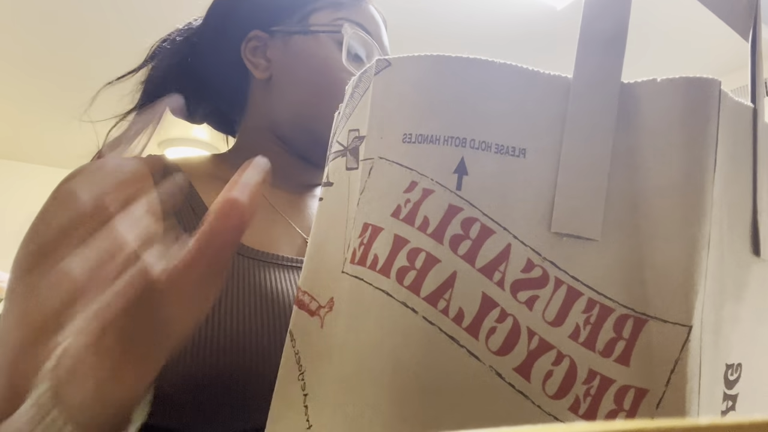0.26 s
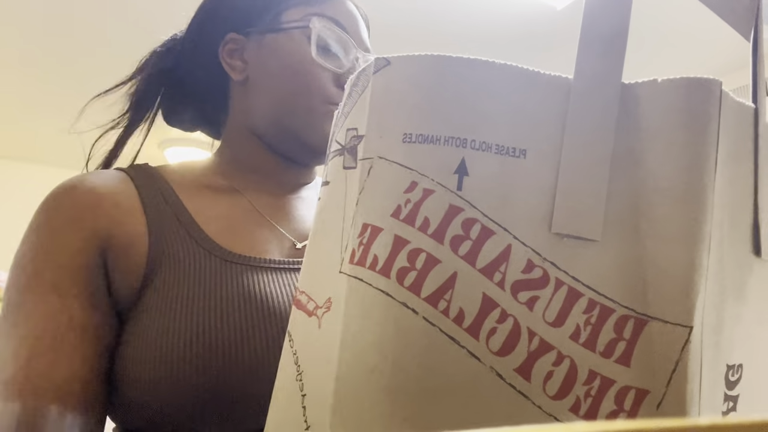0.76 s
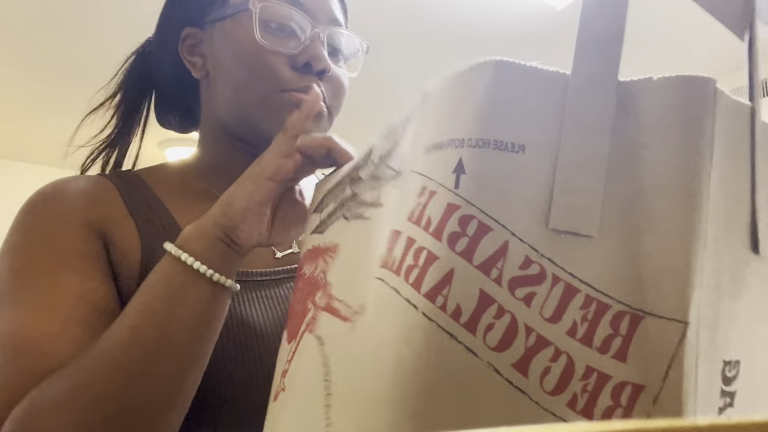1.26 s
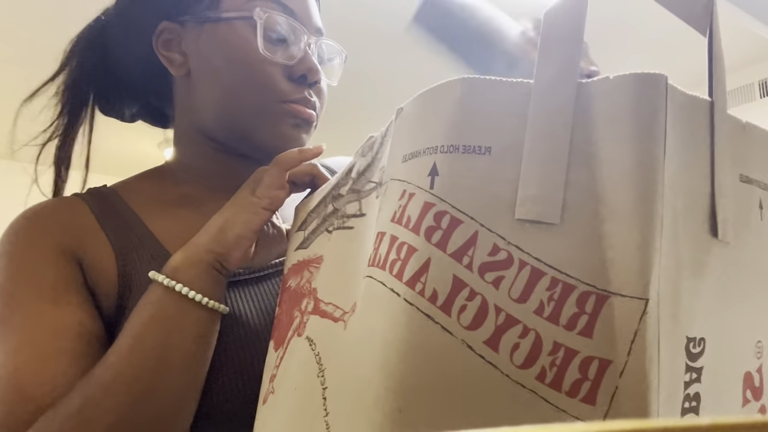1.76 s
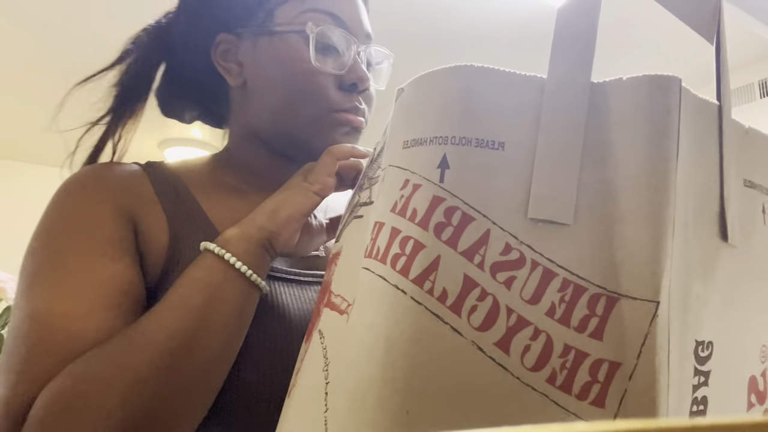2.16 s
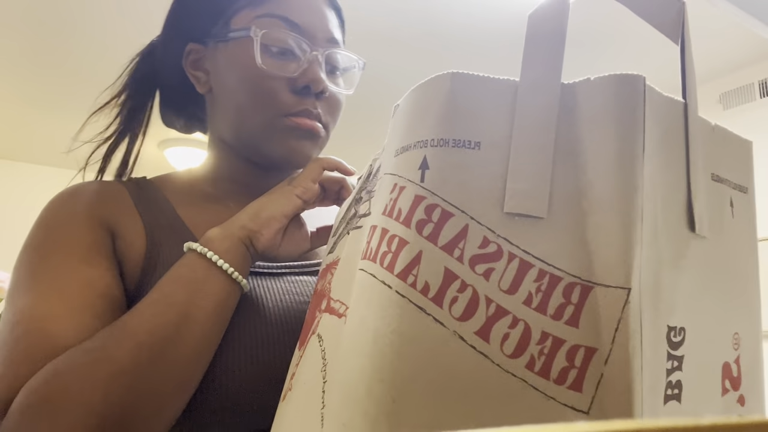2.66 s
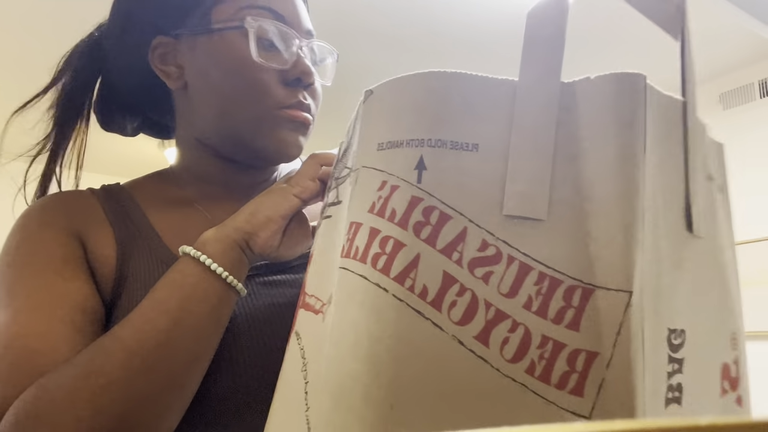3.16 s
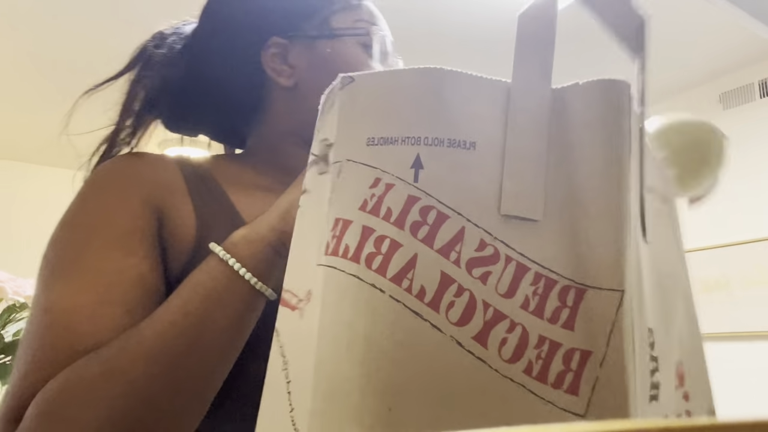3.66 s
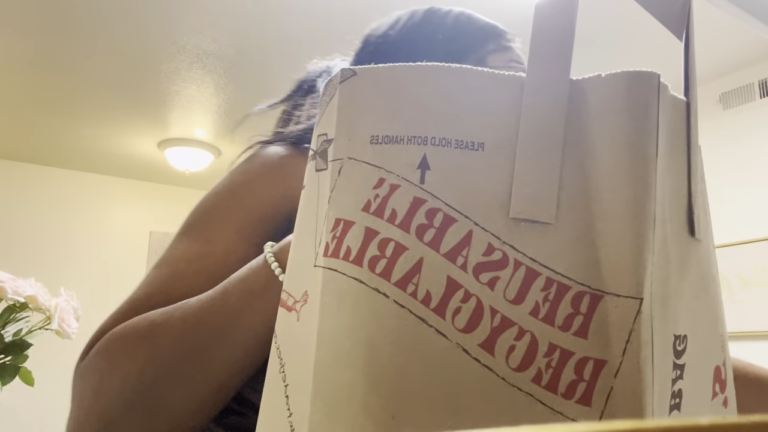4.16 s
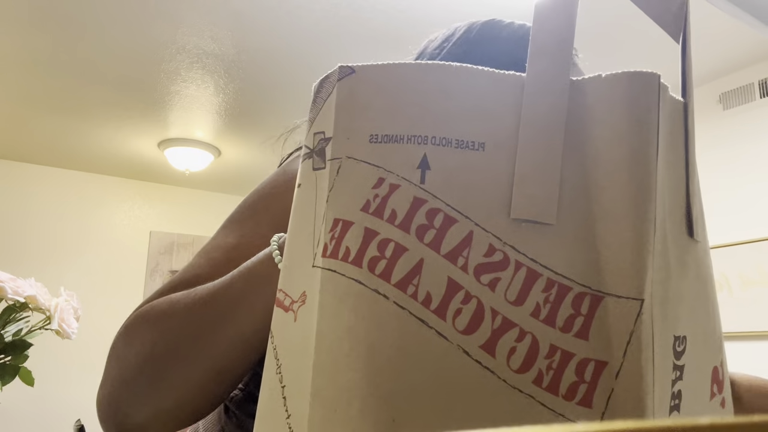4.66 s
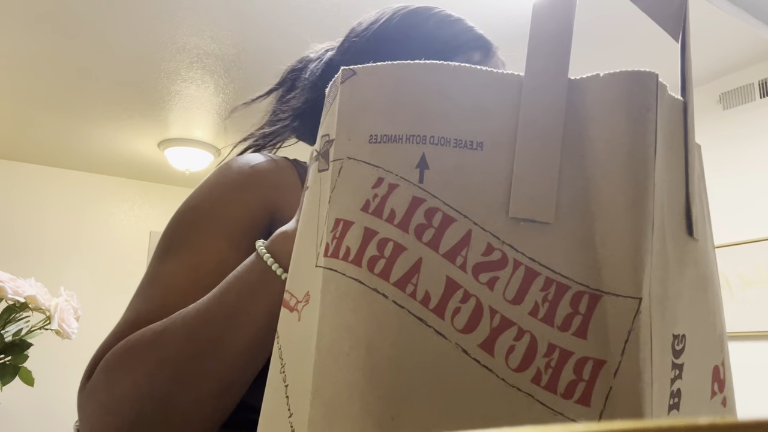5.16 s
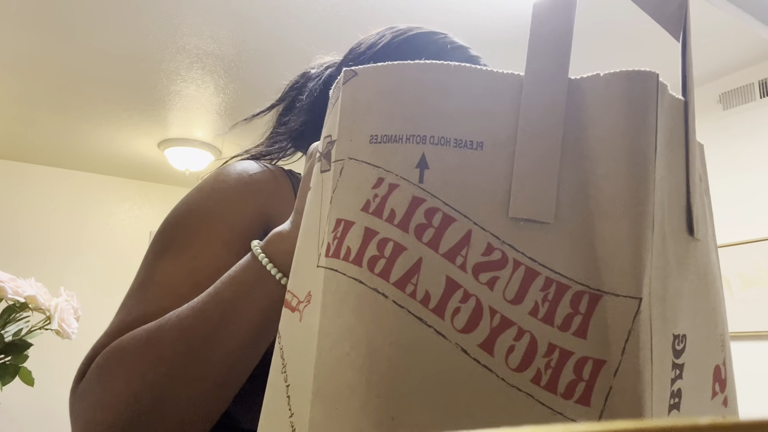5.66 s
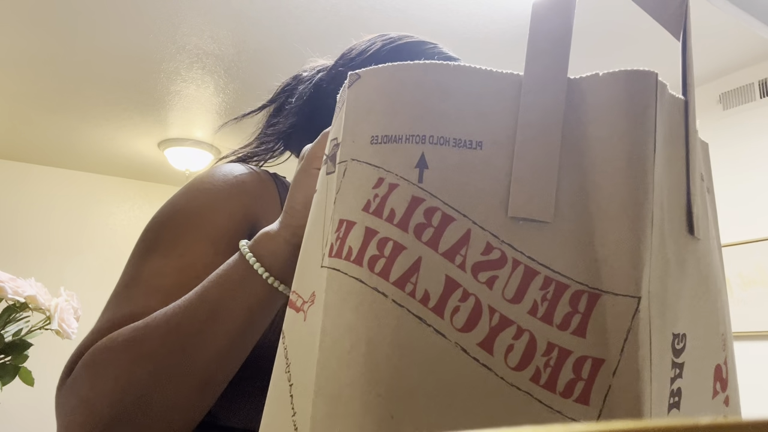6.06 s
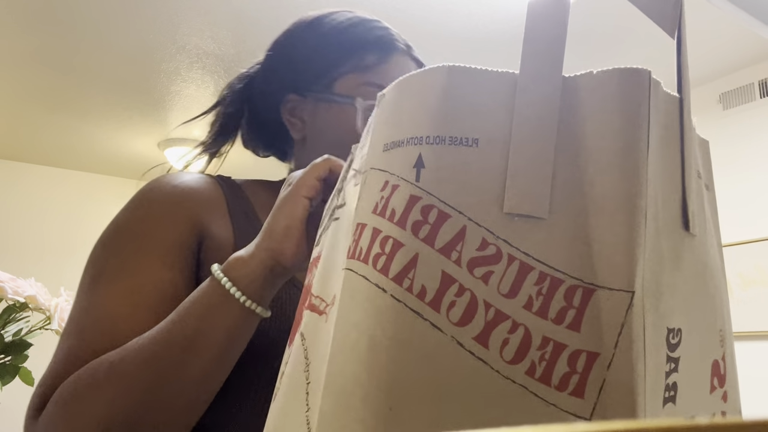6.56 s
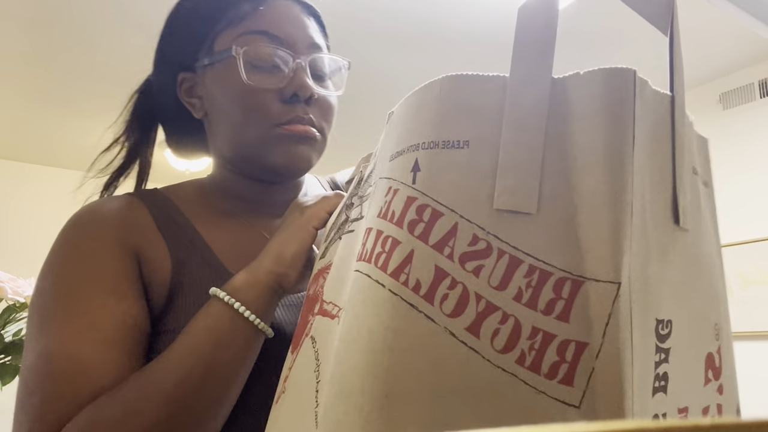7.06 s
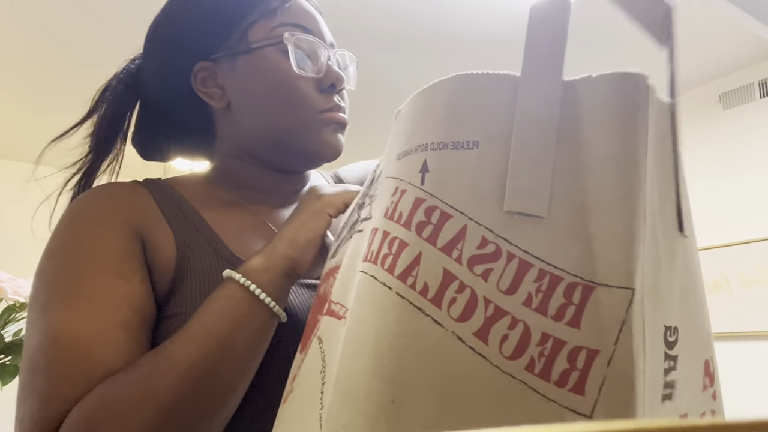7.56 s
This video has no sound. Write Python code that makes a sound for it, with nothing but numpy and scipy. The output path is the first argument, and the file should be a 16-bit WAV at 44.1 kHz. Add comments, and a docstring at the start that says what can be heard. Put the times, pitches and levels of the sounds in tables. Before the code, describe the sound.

Close stereo pickup of a stiff paper grocery bag on a counter in a small, hard kitchen, with low fridge hum, dull air and thin hiss beneath. At 0.1 s packets clatter and creases snap sharply; another packet knock lands around 0.45 s, and a harder one with a short tub ring at 0.9 s. From 1.2 to 1.7 s paper walls flap with low thumps and midrange tocks. At 2.2 s packs bump dully with a crisp paper snap, then scattered crinkles continue, with snaps near 2.8 and a fuller flap around 3.6 s. Rustling fades until a clattering knock at 4.5 s. From 5 to 6.4 s it is almost still, with a soft knock at 5.7 s. Faint creasing resumes, then from 7.1 s to the end come strong, dense crackles, scrapes and wall thumps.

```python
"""Stiff paper rustles and, almost at once, packed groceries clatter as hands dig through a grocery bag on a counter.
Shaped noise makes the sliding paper; short pitched swings and noise bursts make its snapping creases.
Low swings flap the walls, packs land in showers of small contacts, and a knocked tub rings in tuned modes.
A small hard kitchen answers with early reflections and a noise tail, over a fridge hum, dull air and a thin hiss."""
import sys
import numpy as np
from scipy import signal
from scipy.fft import rfft, irfft, next_fast_len
from scipy.io import wavfile

SR = 44100
rng = np.random.default_rng(int(sys.argv[2]) if len(sys.argv) > 2 else 0)


def inscribe(sig):
    """Save sig as 16-bit PCM at rate SR to the path in sys.argv[1].

    A 1-D sig is mono; a 2-D sig holds one channel per row.
    Samples are clipped to [-1, 1] before scaling.
    """
    pcm = np.round(np.clip(np.atleast_2d(sig).T, -1, 1) * 32767)
    wavfile.write(sys.argv[1], SR, pcm.astype(np.int16))


N = 344862
TIME = np.arange(N) / SR
SIZE = next_fast_len(N + SR, real=True)
FREQ = np.maximum(np.arange(SIZE // 2 + 1) * SR / SIZE, 1)


def undb(db):
    """Decibels to gain."""
    return 10 ** (np.asarray(db) / 20)


def over_freq(points):
    """Join (hz, value) points on a log-frequency axis."""
    hz, value = np.transpose(points)
    return np.interp(np.log(FREQ), np.log(hz), value)


def peaks(rings):
    """Level in dB of a set of resonances and dips."""
    return sum(db / (1 + (2 * (FREQ - hz) / width) ** 2) for hz, width, db in rings)


def resonant(points, rings):
    """Gain of a broad colour with resonance peaks on it."""
    return undb(over_freq(points) + peaks(rings))


def band(lo_hz, hi_hz, order=8):
    """Gain of a band with steep, smooth edges."""
    return 1 / np.sqrt((1 + (lo_hz / FREQ) ** order) * (1 + (FREQ / hi_hz) ** order))


def colour(x, gain):
    """Causal minimum-phase filter with the given gain shape; white noise keeps its power."""
    unit_gain = gain / np.sqrt(np.mean(gain ** 2))
    cepstrum = irfft(np.log(unit_gain + 1e-4), SIZE)
    # fold the cepstrum forward in time so that the filter never rings early
    cepstrum[1:SIZE // 2] *= 2
    cepstrum[SIZE // 2 + 1:] = 0
    return irfft(rfft(x, SIZE) * np.exp(rfft(cepstrum)), SIZE)[..., :N]


def add(track, s, sound):
    """Mix a sound into a track at time s."""
    start = max(int(s * SR), 0)
    part = track[..., start:start + sound.shape[-1]]
    part += sound[..., :part.shape[-1]]


def fade(t60):
    """An exponential decay down to -60 dB, kept between 2 ms and 1 s long."""
    count = int(np.clip(t60, .002, 1) * SR)
    return np.exp(-np.log(1000) * np.arange(count) / count)


def walk(rate):
    """Wandering random curve with a spread near 1 and the given number of turning points a second."""
    knots = rng.standard_normal(4096)
    return np.interp(TIME * rate, np.arange(len(knots)), knots)


def crinkle(rate, spread_db, t60):
    """Envelope of fibres giving way at random, mostly small and a few large; mean power 1."""
    breaks = rng.random(N) < rate / SR
    size = undb(spread_db * np.minimum(rng.exponential(size=N), 4))
    power = np.abs(signal.oaconvolve(breaks * size ** 2, fade(t60) ** 2)[:N])
    return np.sqrt(power / power.mean())


# strokes of a hand sliding the paper; start_s is when the stroke has taken hold, levels are relative
# columns: start_s, length_s, rustle_db, hiss_db, wall_sway_db
HAND_STROKES = [(0.0, 0.38, -41.5, -43, -47.5), (0.172, 0.038, -57, -56.5, -30),
                (0.496, 0.068, -41, -35.5, -38.5), (0.61, 0.31, -47, -47.5, -59),
                (0.944, 0.044, -39, -42.5, -34), (1.231, 0.29, -40, -50.5, -33),
                (1.601, 0.017, -41, -45, -41), (1.673, 0.013, -42.5, -47.5, -29),
                (1.752, 0.36, -47, -54, -46.5), (2.265, 0.036, -26, -38, -28.5),
                (2.856, 0.0096, -34.5, -38, -26.5), (3.091, 0.032, -46, -49, -41.5),
                (3.154, 0.045, -48, -59.5, -37), (3.602, 0.094, -37.5, -49.5, -30),
                (3.782, 0.029, -62, -59, -40), (4.122, 0.42, -57, -65, -51),
                (4.585, 0.039, -27, -34, -28.5), (4.714, 0.1, -50.5, -78, -42),
                (4.866, 0.26, -62, -75.5, -51), (5.195, 0.039, -48.5, -56.5, -45),
                (6.365, 0.13, -59.5, -77, -45), (6.504, 0.18, -59.5, -70, -53),
                (6.66, 0.1, -51.5, -57.5, -50), (6.803, 0.11, -55, -74, -50.5),
                (6.983, 0.18, -52, -56.5, -48), (7.119, 0.12, -32, -41.5, -27.5),
                (7.431, 0.018, -36, -41.5, -34.5), (7.505, 0.042, -31.5, -36, -30),
                (7.636, 0.3, -32.5, -41, -34)]
# a stroke swells in as the paper takes the load, then eases a little
STROKE_RISE_DB_PER_S, STROKE_SAG_DB_PER_S = 260, 1.5
# the paper settles after the hand stops
SLIDE_RELEASE_DB_PER_S, SWAY_RELEASE_DB_PER_S = 171, 135
# rustle, hiss and sway while the arm only leans on the bag
RESTING_DB = (-76, -83, -54)


def effort(levels_db, resting_db, release_db_per_s):
    """Strength of the hands' work: every stroke swells, holds with a slight sag and dies away."""
    t = TIME[::64]
    power = undb(resting_db) ** 2
    for (s, length, *_), db in zip(HAND_STROKES, levels_db):
        early, held, late = np.maximum([s - t, t - s, t - s - length], 0)
        rise_db = STROKE_RISE_DB_PER_S * early
        fall_db = STROKE_SAG_DB_PER_S * held + release_db_per_s * late
        power = power + undb(db - rise_db - fall_db) ** 2
    return np.interp(TIME, t, np.sqrt(power))


def hands():
    """How strongly the strokes drive the rustle, the hiss and the sway of the walls."""
    releases = SLIDE_RELEASE_DB_PER_S, SLIDE_RELEASE_DB_PER_S, SWAY_RELEASE_DB_PER_S
    return [effort(*drive) for drive in zip(np.transpose(HAND_STROKES)[2:], RESTING_DB, releases)]


def pop(hz, t60, rise_s, overtone_ratio, overtone_db):
    """A stiff facet swings for a few cycles, along with a shorter overtone."""
    decay = fade(t60)
    t = TIME[:len(decay)]
    fundamental = np.sin(2 * np.pi * hz * t)
    overtone = undb(overtone_db) * decay * np.sin(2 * np.pi * hz * overtone_ratio * t)
    return decay * (1 - np.exp(-t / rise_s)) * (fundamental + overtone)


def facets(effort, count=520, centre_hz=1150, octaves=.55, spread_db=4.5, t60=0.023):
    """Small facets buckle at random, each with its own pitch, louder as the hands work harder."""
    out = np.zeros((2, N))
    times = rng.random(count) * (N - 1) / SR
    sizes = np.minimum(rng.exponential(size=count), 3)
    for s, size, (pitch, facing) in zip(times, sizes, rng.standard_normal((count, 2))):
        tock = pop(centre_hz * 2 ** (octaves * pitch), t60, 0.0081, 1.0, -11.5)
        level = effort[int(s * SR)] * undb(spread_db * size)
        add(out, s, level * tock * np.array([[1], [np.tanh(facing)]]))
    return out


# colour of the paper, relative level; columns: pitch_hz, level_db
PAPER_COLOUR = [(60, 15.5), (120, -1), (250, -9), (420, 0), (650, 1.5), (1050, -0.5), (1600, -5),
                (2600, -15.5), (4500, -22), (7000, -25), (11000, -31), (15500, -31.5)]
# resonances of the bag; columns: pitch_hz, width_hz, boost_db
BAG_RESONANCES = [(109, 58, 14), (234.5, 110, 20), (304, 50, 1), (1025, 14, 6.5)]
# share of the rustle's power that is a smooth slide; the rest crinkles
SLIDE_SHARE = .55


def rustle(mid, hiss, sway, rustle_db=-5, hiss_db=-2, sway_db=-5, facet_db=0, judder_db=1.0):
    """Paper rubs on paper: a slide shot through with crinkles and buckling facets, over the sway of the walls."""
    crinkle_power = crinkle(rate=270, spread_db=4.5, t60=.025) ** 2
    grip = np.sqrt(SLIDE_SHARE + (1 - SLIDE_SHARE) * crinkle_power) * undb(judder_db * walk(40))
    friction = rng.standard_normal((2, N))
    paper = resonant(PAPER_COLOUR, BAG_RESONANCES)
    slide = colour(friction * grip * mid, paper * band(390, 3600))
    bright = colour(friction * grip * hiss, paper * band(2900, 17000))
    # the heavy walls follow only the mean push, not each catch of the grip
    walls = colour(friction * sway, paper * band(39, 480))
    rubbing = slide * undb(rustle_db) + bright * undb(hiss_db) + walls * undb(sway_db)
    return rubbing + facets(mid) * undb(facet_db)


def crack(hz, t60, low_ratio=0.65, high_ratio=1.405):
    """A fold gives way at once: a dry burst about an octave wide around its pitch."""
    decay = fade(t60)
    edges = np.clip([hz * low_ratio, hz * high_ratio], 50, .45 * SR)
    burst = rng.standard_normal((2, len(decay))) * decay
    sos = signal.butter(4, edges, "band", fs=SR, output="sos")
    # make up for the power lost outside the band
    return signal.sosfilt(sos, burst) * np.sqrt(SR / 2 / (edges[1] - edges[0]))


def ticks(hiss, count=400, centre_hz=4200, octaves=0.96, tick_db=-5, spread_db=4, t60=0.0044):
    """Tiny kinks tick at random, each with its own high pitch, following the hiss of the stroke."""
    out = np.zeros((2, N))
    for when, chance, pitch in rng.random((count, 3)):
        size = min(-np.log(1 - chance), 2.5)
        level = hiss[int(when * N)] * undb(tick_db + spread_db * size)
        hz = centre_hz * 2 ** (octaves * (2 * pitch - 1))
        add(out, when * N / SR, level * crack(hz, t60))
    return out


KICK_RISE_CYCLES = .45


def kick(hz, cycles):
    """A facet flips over: a swing that builds within its first cycle and dies over the given number of cycles."""
    decay = fade(cycles / hz)
    turns = hz * TIME[:len(decay)]
    return decay * (1 - np.exp(-(turns / KICK_RISE_CYCLES) ** 2)) * np.sin(2 * np.pi * turns)


def folds(x, echo, count=5, reach_s=.004):
    """A few echoes off nearby folds give each blow its own uneven colour at about the same power."""
    lags = (reach_s * SR * (.1 + .9 * rng.random(count))).astype(int)
    signs = rng.choice([-1, 1], count)
    echoes = sum(sign * np.roll(x, lag, axis=-1) for lag, sign in zip(lags, signs))
    return (x + echo * echoes) / np.sqrt(1 + count * echo ** 2)


def strikes(table, gain, grain, rise_s, fold_echo, body_db, mid_db, crackle_db, body_hold, pop_db, pop_hold,
            sideways, crack_db, crack_hold, crackle_rise_s, kick_db, kick_cycles):
    """Each blow kicks, cracks and pops a facet and sets off a dying shower of slips in body, panel and creases."""
    showers, pops = np.zeros((3, 2, N)), np.zeros((2, N))
    for s, db, crackle, body, hz, t60 in table:
        longest = len(fade(t60 * max(body_hold, 1)))
        slips = folds(rng.standard_normal((2, longest)), fold_echo)
        parts = ((body + body_db, t60 * body_hold, rise_s),
                 (mid_db, t60, rise_s),
                 (crackle + crackle_db, t60, crackle_rise_s))
        for track, (part_db, life, rise) in zip(showers, parts):
            decay = fade(life)
            swell = 1 - np.exp(-TIME[:len(decay)] / rise)
            add(track, s, undb(db + part_db) * swell * decay * slips[:, :len(decay)])
        facing = np.array([[1], [rng.choice([-1, 1]) * sideways]])
        add(pops, s, undb(db + kick_db) * kick(hz, kick_cycles) * facing)
        add(pops, s, undb(db + pop_db) * pop(hz, t60 * pop_hold, rise_s, 1.4, -12.0) * facing)
        add(pops, s, undb(db + crack_db) * crack(hz, t60 * crack_hold))
    bands = band(170, 600), band(600, 2500), band(2500, 17000)
    return pops + sum(colour(shower * grain, gain * b) for shower, b in zip(showers, bands))


# small creases give way at random under a stroke; the level is the least one, over the rustle
CREASES_PER_S, CREASE_DB, CREASE_SPREAD_DB = 14, -1, 3.5
# usual pitch of the facet and its scatter either way
FACET_HZ, CREASE_OCTAVES = 1070, 0.54
# how much a crease moves the wall, its basic decay time, and its crackle, duller than the slide around it
CREASE_BODY_DB, CREASE_T60_S, CREASE_CRACKLE_DB = -7, 0.072, -14


def small_creases(mid, hiss):
    """Random little snaps, mostly faint and a few clear, whose level and crispness follow the stroke."""
    rows = []
    for when, chance, pitch in rng.random((int(CREASES_PER_S * N / SR), 3)):
        i = int(when * N)
        size = min(-np.log(1 - chance), 2)
        db = 20 * np.log10(mid[i]) + CREASE_DB + CREASE_SPREAD_DB * size
        crackle = CREASE_CRACKLE_DB + 20 * np.log10(hiss[i] / mid[i])
        hz = FACET_HZ * 2 ** (CREASE_OCTAVES * (2 * pitch - 1))
        rows.append((i / SR, db, crackle, CREASE_BODY_DB, hz, CREASE_T60_S))
    return rows


# the clearest creases snapping, edges scraping and fingers tapping the paper; levels are relative,
# pitch is that of the popping facet, t60 the basic decay time
# columns: start_s, snap_db, crackle_over_snap_db, body_over_snap_db, pitch_hz, t60_s
CLEAR_SNAPS = [(0.016, -33, -8, -19, 1050, .05), (0.053, -24.5, -2, -7.5, 1180, .06),
               (0.063, -24, -7, -13, 888, .07), (0.123, -13.5, -12, -2.5, 1510, 0.038),
               (0.152, -11, -19, -4.5, 1450, .04), (0.208, -15, -4, -4, 1417, .03),
               (0.279, -29.5, -7, -15.5, 950, .08), (0.309, -40.5, 7.5, -7.5, 2550, 0.15),
               (0.38, -45, 9, -9, 1500, .14), (0.438, -23, -9, -7.5, 1500, .05),
               (0.53, -22, -2, -9, 1037, .08), (0.576, -25.5, 4, -16.5, 3040, .055),
               (0.621, -38, 7.5, -10, 1507, .06), (0.682, -33, -4, -16, 3300, .05),
               (0.692, -33, -2, -16.5, 4020, .07), (0.744, -33.5, 2.5, -11.5, 3450, .06),
               (0.767, -32.5, 2.5, -9, 1248, .08), (0.807, -35, 0.5, -7, 1091, 0.083),
               (0.993, -33.5, 3, -9, 1290, .05), (1.038, -33.5, 1, -4.5, 1504, .07),
               (1.067, -27.5, -20, -16, 2205, .06), (1.214, -28, -23, 1, 897, .09),
               (1.252, -21, -13, -6, 1120, 0.059), (1.281, -23, -13.5, -1.5, 1039, .07),
               (1.328, -24.5, -19, -9, 1086, .08), (1.371, -33, -13, 2.5, 895, .07),
               (1.427, -21, -40, -11.5, 1093, .08), (1.588, -20, -13, -29, 1680, .075),
               (1.614, -34, 3, -15, 1910, 0.059), (1.638, -28, -30, 1, 1056, .08),
               (1.70, -35, -14, -8, 1600, .06), (1.767, -32, -17, 1, 976, .08),
               (1.925, -40.5, -24, -11, 1950, 0.055), (1.975, -35.5, -16, -13.5, 1090, .06),
               (1.993, -32.5, -16, -14, 1490, .06), (2.054, -31.5, -17, -7.5, 1890, .06),
               (2.07, -31, -17, -10.5, 1006, .06), (2.138, -34.5, -26, -7.5, 1028, .07),
               (2.179, -51.5, 7, -10, 3830, .05), (2.252, -15, -14, -7, 1550, 0.052),
               (2.288, -22, -16, -1.5, 1050, 0.055), (2.328, -26, -20, 0, 1000, .05),
               (2.49, -35, -10, -11.5, 1300, .08), (2.622, -28.5, -14, -14, 1386, .07),
               (2.826, -29, -17.5, -2.5, 930, .07), (2.834, -21, -22, -7.5, 1009, .08),
               (2.966, -20.5, -18, -5, 1196, .06), (3.057, -45.5, 1, -12, 1500, .25),
               (3.069, -35.5, -8, -3.5, 934, 0.079), (3.137, -33.5, -28, -2.5, 930, .05),
               (3.226, -39.5, -22, -2.5, 844, .06), (3.249, -32.5, -14.5, 1, 1030, .075),
               (3.374, -41.5, -27, 1, 883, .08), (3.468, -39, -15.5, -5.5, 845, .08),
               (3.576, -35.5, -18.5, -8, 1423, .12), (3.631, -19.5, -20, -4, 850, 0.083),
               (3.644, -19, -29, -3.5, 826, 0.077), (3.718, -28.5, -18, 4.5, 1060, .08),
               (3.734, -26, -23, -9, 1096, .07), (3.819, -36, -22, -6.5, 1030, .08),
               (4.043, -33, -25, 0.5, 925, .07), (4.128, -44.5, -22.5, -10, 1050, .06),
               (4.158, -36, -11.5, -9.5, 1050, .07), (4.206, -45.5, -10, -12, 4100, 0.13),
               (4.222, -39.5, -14, 1, 980, 0.075), (4.265, -34.5, -21, -12, 1100, .06),
               (4.590, -16, -17.5, -9, 962, 0.097), (4.752, -41.5, -13, -10, 1157, .06),
               (4.832, -41.5, -30, -2.5, 1003, .06), (4.879, -54, -21, -10, 2100, .09),
               (4.929, -47.5, -9, -3, 1060, .08), (5.058, -57, -18, -10, 2000, .07),
               (5.104, -51, -19, -3, 1020, .07), (5.149, -56, -14, -9.5, 2293, .05),
               (5.173, -38, -15, -4, 980, .07), (5.204, -31.5, -9.5, -1.5, 826, .07),
               (5.666, -25, -32, 0.5, 810, .07), (5.669, -36.5, -26, -5, 1587, .06),
               (5.76, -42, -18, 0.5, 1000, .08), (5.889, -44.5, -16, -2.5, 836, 0.11),
               (6.448, -38, -32, 4.5, 1340, 0.081), (6.477, -59.5, -1, -5, 3060, .22),
               (6.549, -42, -21, 3, 800, .09), (6.582, -33.5, -15, 3, 830, 0.098),
               (6.637, -24, -24.5, -2.5, 1120, .08), (6.792, -39, -24, 1.5, 961, .08),
               (6.821, -43, -20, -6, 1510, 0.044), (6.853, -36, -23, -1, 980, .07),
               (6.926, -35, -28, -4.5, 850, 0.037), (6.949, -32.5, -13, -3, 1220, 0.085),
               (6.972, -38.5, -18, -4, 800, 0.065), (7.069, -40, -18, -16, 1150, 0.044),
               (7.093, -30.5, -14, 2, 794, .07), (7.124, -29, -5, -1, 1000, .08),
               (7.157, -20.5, -10.5, 1, 940, .07), (7.206, -12, -16, -6, 1126, .03),
               (7.231, -18.5, -6, -15, 1700, .08), (7.239, -18, -8.5, -3.5, 1810, .06),
               (7.276, -22, -6, -3, 987, .05), (7.294, -32.5, 3.5, 0.5, 2720, 0.075),
               (7.31, -20, -8, -4.5, 1680, .07), (7.413, -16.5, -13.5, -4.5, 1050, .04),
               (7.481, -27.5, -10, -2.5, 990, .04), (7.496, -22.5, -8, -0.5, 973, .06),
               (7.506, -20, -6.5, -10, 1000, .04), (7.544, -25, -14, -8.5, 1006, .07),
               (7.559, -21.5, -22, -3, 1470, .07), (7.627, -32, -3, -16, 1720, .06),
               (7.65, -19, -11, -2.5, 1150, 0.076), (7.675, -32.5, -6, -9, 1300, 0.055),
               (7.726, -20.5, -14, -15, 1300, .06), (7.737, -21, -13, -1.5, 1497, .07),
               (7.786, -25.5, -5, -9.5, 947, .05), (7.811, -19, -2.5, 0, 1300, .08)]


def snaps(creases):
    """Creases in the stiff paper pop through with a short tock, and the paper around them crackles."""
    grain = crinkle(rate=1300, spread_db=0.5, t60=0.014)
    return strikes(creases, resonant(PAPER_COLOUR, BAG_RESONANCES), grain,
                   rise_s=0.0011, fold_echo=0.42, sideways=0.4,
                   body_db=-2.5, body_hold=1.1, mid_db=-10,
                   crackle_db=-2.5, crackle_rise_s=0.00078,
                   pop_db=-6, pop_hold=0.5, crack_db=-8, crack_hold=.5,
                   kick_db=2.0, kick_cycles=5.5)


# a wall of the bag flaps or a load knocks on the counter, relative level
# columns: start_s, level_db, pitch_hz, t60_s
WALL_THUMPS = [(0.121, -11, 290, 0.067), (0.153, -12, 98, 0.13), (0.157, -40, 238, 0.072),
               (0.886, -23, 104.4, 0.19), (0.963, -13.5, 270, 0.053), (1.221, -18, 85, 0.066),
               (1.412, -13, 151, 0.036), (1.439, -18, 100.4, 0.099), (1.468, -3.5, 217, 0.025),
               (1.706, -24.5, 332, .05), (1.711, -18, 85, 0.081), (2.213, -12.5, 486, 0.09),
               (2.220, -19, 400, 0.05), (2.218, -10, 250, 0.084), (2.22, -21, 90, 0.15),
               (2.256, -10, 178, 0.093), (2.851, -24, 81, 0.22), (3.586, -22.5, 84.3, 0.095),
               (3.631, -22, 223, 0.13), (3.661, -20.5, 227, 0.11), (3.716, -24.5, 273, 0.031),
               (3.735, -19.5, 102.4, 0.13), (4.413, -28.5, 209, 0.035), (4.494, -15, 132, 0.096),
               (4.495, -10, 557, 0.084), (4.500, -20.5, 684, 0.12), (4.544, -23.5, 106.4, 0.11),
               (5.669, -16, 436.4, 0.043), (5.671, -19, 253, 0.04), (5.891, -30.5, 211, 0.053),
               (6.583, -26.5, 219.4, 0.062), (7.097, -1, 150, 0.015), (7.113, -13.5, 104.4, 0.07),
               (7.154, -17, 240, 0.076), (7.237, -20.5, 294, 0.069), (7.419, 1, 199, 0.018),
               (7.425, -16.5, 65, 0.11), (7.451, -17, 298, 0.041), (7.553, -14.5, 234, 0.032),
               (7.561, -15, 380, 0.034), (7.578, -13, 76.5, 0.05), (7.624, -17.5, 81, 0.05)]


def thumps(rise_s=0.0032, thump_db=1, sideways=0.35):
    """Soft pushes swing the walls of the bag and the counter."""
    out = np.zeros(N)
    for s, db, hz, t60 in WALL_THUMPS:
        add(out, s, undb(db + thump_db) * pop(hz, t60, rise_s, 2.2, -7.0))
    return out * np.array([[.9], [-sideways]])


# packets landing or being gripped; levels are relative, t60 the basic decay time
# columns: start_s, clatter_db, crackle_over_clatter_db, body_over_clatter_db, pitch_hz, t60_s
PACKET_HITS = [(0.099, -12.5, -11, -13.5, 1550, 0.15), (0.106, -14.5, -6.5, -13.5, 1795, 0.08),
               (0.121, -15, -13, -7.5, 1480, 0.19), (0.140, -22, 2.5, -9.5, 1500, 0.07),
               (0.149, -12, -12.5, -8, 1480, 0.13), (0.160, -13.5, -12, -3, 864, 0.076),
               (0.201, -17, -6, -1.5, 1060, 0.049), (0.435, -21.5, -11, -16.5, 1120, 0.15),
               (0.475, -12, -9, -15.5, 850, 0.098), (0.498, -28.5, 8.5, -12.5, 1220, 0.038),
               (0.873, -5.5, -6.5, -12.5, 1430, 0.043), (0.887, -8.5, -9.5, -11.5, 1120, 0.085),
               (0.901, -12, -9.5, -12, 1825, 0.092), (0.920, -19.5, 2, -5.5, 1820, 0.052),
               (0.962, -14, -25, -6, 1240, 0.061), (2.210, -21.5, -14, 3, 980, 0.11),
               (2.219, -14.5, -21, -2, 604, 0.18), (2.249, -17, -12, -2, 1800, 0.12),
               (2.259, -15.5, -32.5, 2.5, 1040, .13), (4.492, -14, -5.5, -7, 1650, 0.085),
               (4.505, -12, -13, -12.5, 705, 0.15), (4.513, -18, -28, -21.5, 970, 0.2),
               (4.618, -26.5, -6, -7.5, 1520, .09)]
# colour of the groceries, relative level; columns: pitch_hz, level_db
PACKET_COLOUR = [(100, -6.5), (250, 6), (400, -7.5), (520, 2.5), (700, 1.5), (1100, 1), (1600, -3),
                 (2600, -11), (4500, -9.5), (7000, -13.5), (11000, -19.5), (13500, -18.5), (15500, -22.5)]
# resonances of the counter and the packets; columns: pitch_hz, width_hz, boost_db
PACKET_RESONANCES = [(196, 27, 2), (438, 64, 11.5), (906, 50, -9), (1040, 49, 2), (1880, 160, 4.5),
                     (2740, 240, 2)]


def packets():
    """Plastic and card packs land in several quick contacts."""
    grain = crinkle(rate=2400, spread_db=2.0, t60=0.011)
    return strikes(PACKET_HITS, resonant(PACKET_COLOUR, PACKET_RESONANCES), grain,
                   rise_s=0.0027, fold_echo=0.2, sideways=0.2,
                   body_db=2.5, body_hold=0.9, mid_db=-5.5,
                   crackle_db=5.0, crackle_rise_s=0.0042,
                   pop_db=-8.0, pop_hold=0.45, crack_db=-12.5, crack_hold=0.6,
                   kick_db=-2.5, kick_cycles=4.5)


def buckles(count=4, buckle_db=-3, spread_over_t60=.35, centre_hz=1550, octaves=.7, cycles=22):
    """A squeezed packet's wrapper buckles a few more times, each at a new pitch and weaker as the blow dies."""
    out = np.zeros((2, N))
    for s, db, *_, t60 in PACKET_HITS:
        for when, pitch, facing in rng.random((count, 3)):
            late = when * spread_over_t60
            hz = centre_hz * 2 ** (octaves * (2 * pitch - 1))
            tock = kick(hz, cycles) * np.exp(-np.log(1000) * late / 2)
            direction = np.array([[np.cos(np.pi * facing)], [np.sin(np.pi * facing)]])
            add(out, s + late * t60, undb(db + buckle_db) * tock * direction)
    return out


# a stiff tub among the groceries is knocked; columns: start_s, level_db, pitch_ratio (over its usual pitch)
TUB_HITS = [(0.103, -28, 0.97), (0.151, -27, 0.92), (0.477, -29.5, 0.93), (0.873, -17.5, 1.0),
            (0.901, -25, 0.97), (4.496, -26.5, 0.925)]
# modes of the tub at its usual pitch, relative level; columns: pitch_hz, level_db, t60_s (at pitch_ratio 1)
TUB_RESONANT_MODES = [(1140, -8, 0.1), (1840, -2, .14), (1854, -3.5, .16), (2720, -10.5, .2),
                      (2900, -11, .2), (3519, -14.5, 0.26), (3860, -12, .18), (4506, -15.5, .2),
                      (4930, -15, .22)]


def tub(sideways=0.54, detune=0.0026):
    """The knocked tub rings briefly, a little differently with each grip."""
    out = np.zeros((2, N))
    for s, db, pitch in TUB_HITS:
        chances = rng.standard_normal((len(TUB_RESONANT_MODES), 2))
        for (hz, mode_db, t60), (slip, facing) in zip(TUB_RESONANT_MODES, chances):
            ring = kick(hz * pitch * (1 + detune * slip), t60 * hz)
            add(out, s, undb(db + mode_db) * ring * np.array([[1], [sideways * facing]]))
    return out


def room(x, low_t60=0.49, high_t60=0.46, gap_s=0.006, early_db=-14, count=6):
    """Kitchen echo of unit power: flat cupboard fronts answer within 20 ms, amid a tail whose treble dies sooner."""
    response = np.zeros((2, SR))
    noise = rng.standard_normal((2, SR))
    lows = signal.sosfilt(signal.butter(2, 2000, fs=SR, output="sos"), noise)
    highs = signal.sosfilt(signal.butter(2, 2000, "high", fs=SR, output="sos"), -noise)
    for part, t60 in ((lows, low_t60), (highs, high_t60)):
        decay = fade(t60)
        add(response, gap_s, part[:, :len(decay)] * decay)
    response /= np.sqrt(np.sum(response ** 2) / 2)
    for s, facing in rng.random((count, 2)) * [.02, 2 * np.pi]:
        direction = np.array([[np.cos(facing)], [np.sin(facing)]])
        add(response, s, undb(early_db) * np.sqrt(2) * direction)
    response /= np.sqrt(np.sum(response ** 2) / 2)
    return signal.fftconvolve(x, response, axes=1)[:, :N]


# fridge motor lines, level before wavering and placing; columns: pitch_hz, level_db
FRIDGE_LINES = [(59.2, -53.5), (122.5, -51), (184, -68.5), (474, -70.5), (711, -74.5), (1007, -76)]
# colour of the still room air, relative level; columns: pitch_hz, level_db
AIR_COLOUR = [(20, -24), (35, -9), (55, 3.5), (85, -12), (125, -11), (200, -6), (350, -30), (700, -21),
              (1100, -32.5), (2000, -48.5), (5000, -58.5), (14000, -66)]
AIR_DB = -53.5


def background(hiss_hz=6400, hiss_width_hz=300, hiss_db=-78, waver_db=2, hiss_waver_db=2):
    """The fridge's wavering hum, dull room air and a thin high hiss."""
    hum = np.zeros(N)
    for hz, db in FRIDGE_LINES:
        level = undb(db + waver_db * walk(5.5)) * np.sqrt(2)
        hum += level * np.sin(2 * np.pi * hz * TIME + 0.14 * walk(2.3))
    air = colour(rng.standard_normal((2, N)), undb(over_freq(AIR_COLOUR))) * undb(AIR_DB)
    hiss_gain = 1 / (1 + ((FREQ - hiss_hz) / hiss_width_hz) ** 4)
    hiss = colour(rng.standard_normal((2, N)), hiss_gain) * undb(hiss_db + hiss_waver_db * walk(5))
    return air + hiss + hum * np.array([[.75], [.3]])


# the hollow of the bag colours the paper's rustles, snaps and ticks; columns: pitch_hz, width_hz, boost_db
BAG_HOLLOW = [(484, 60, 5.5), (564, 55, -7.5), (690, 49, -1), (1020, 50, 1), (1250, 110, -1.5),
              (1710, 78, 2), (2110, 810, -1), (2590, 110, -0.5), (2820, 110, 4), (3130, 350, -6)]


def scene(bag_echo_db=-11, packet_echo_db=-10):
    """Bag and groceries in the kitchen, as a centre and a sideways pickup."""
    mid, hiss, sway = hands()
    creases = list(CLEAR_SNAPS) + small_creases(mid, hiss)
    paper = snaps(creases) + rustle(mid, hiss, sway) + ticks(hiss)
    bag = colour(paper, undb(peaks(BAG_HOLLOW))) + thumps()
    groceries = packets() + buckles() + tub()
    echo = room(undb(bag_echo_db) * bag + undb(packet_echo_db) * groceries)
    return bag + groceries + echo + background()


# likeness of the two channels, held within +-0.99; columns: pitch_hz, correlation (no unit)
CHANNEL_LIKENESS = [(50, 0.87), (170, 0.74), (280, 0.46), (420, -0.2), (620, -0.69), (1030, 0.61),
                    (1500, -0.47), (2200, 0.18), (6300, -0.29), (7800, -0.31), (9200, 1), (11000, 0.46),
                    (13000, -0.98)]
# balance of the two channels; columns: pitch_hz, left_minus_right_db
CHANNEL_LEAN = [(60, 1.5), (200, -5), (430, -1.5), (700, 4), (1050, -0.5), (1800, -2.5), (2400, -3),
                (4500, 1.5), (9000, 0.5)]
TOP_HZ = 15900


def record(dry):
    """A stereo pickup whose width and balance change with frequency; peaks are rounded and both ends are cut."""
    likeness = np.clip(over_freq(CHANNEL_LIKENESS), -.99, .99)
    mid, side = rfft(dry, SIZE) * np.sqrt([1 + likeness, 1 - likeness])
    lean = undb(over_freq(CHANNEL_LEAN) / 2)
    stereo = irfft(np.array([(mid + side) * lean, (mid - side) / lean]), SIZE)[:, :N]
    stereo = signal.sosfilt(signal.butter(3, 38, "high", fs=SR, output="sos"), stereo)
    return signal.sosfilt(signal.ellip(8, .2, 70, TOP_HZ, fs=SR, output="sos"), np.tanh(stereo))


dry = scene()
out = record(dry)
inscribe(out)
```